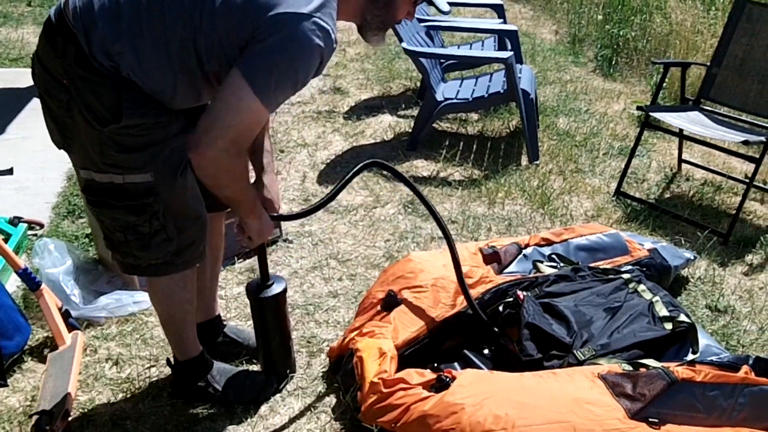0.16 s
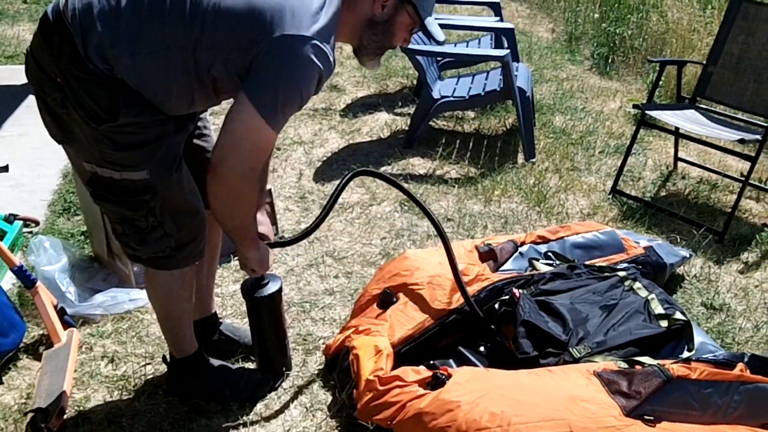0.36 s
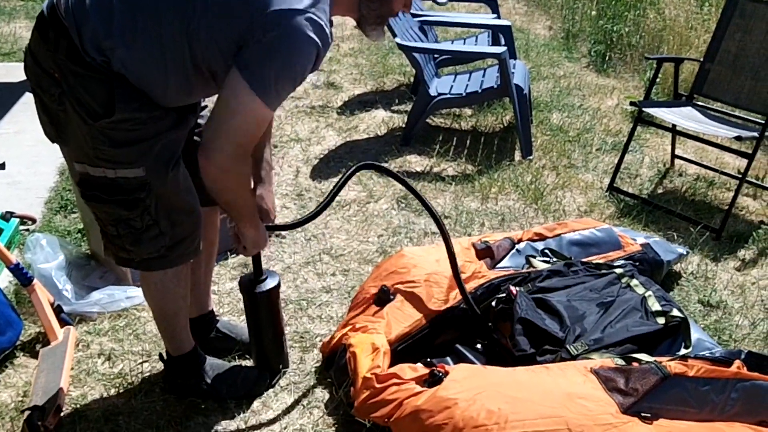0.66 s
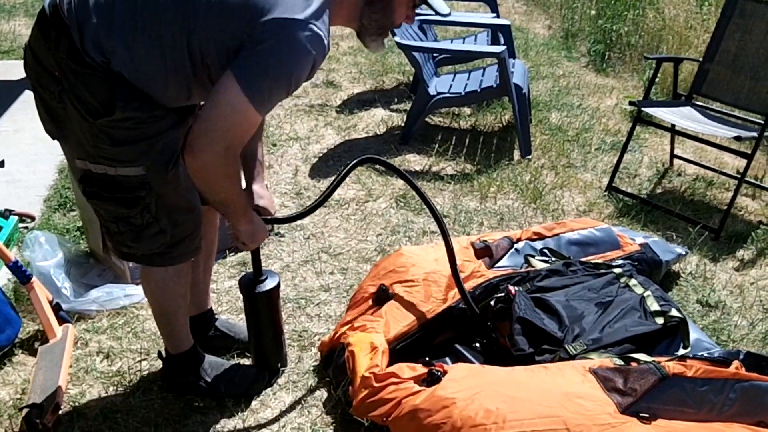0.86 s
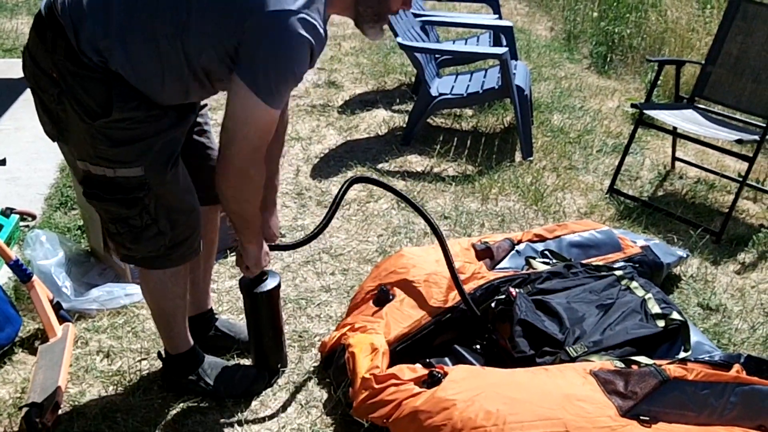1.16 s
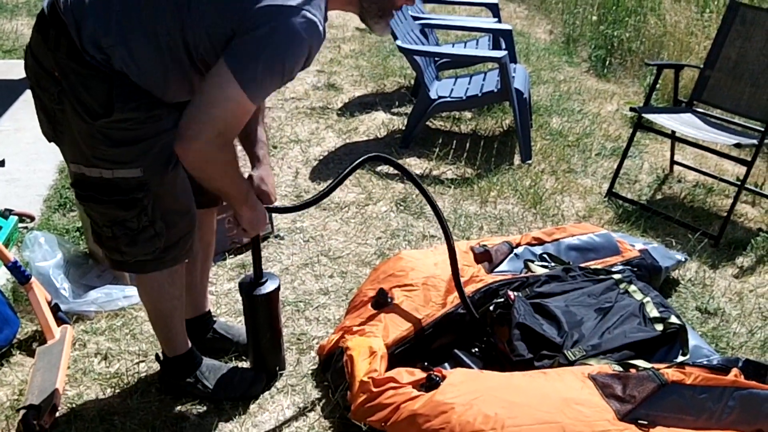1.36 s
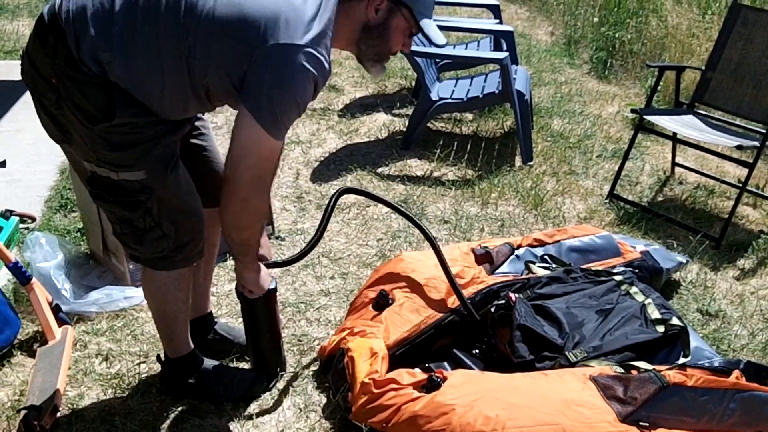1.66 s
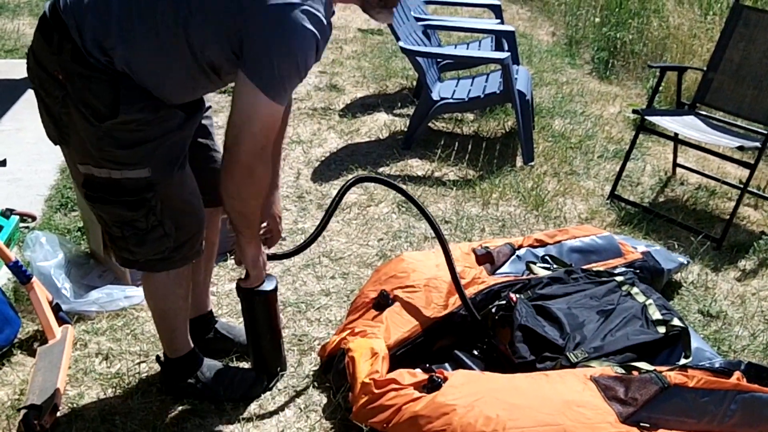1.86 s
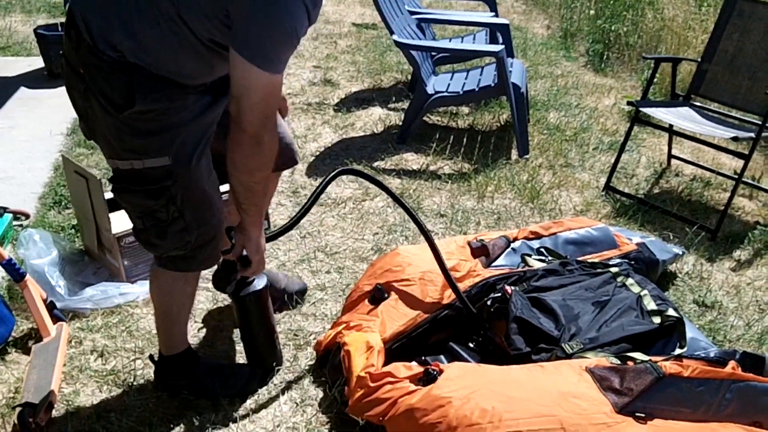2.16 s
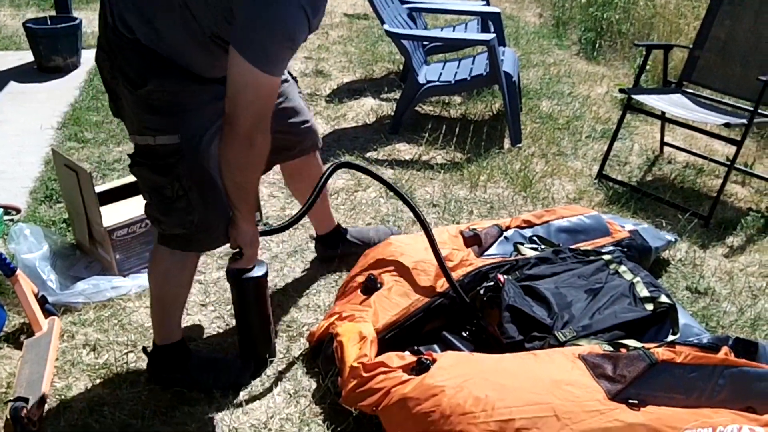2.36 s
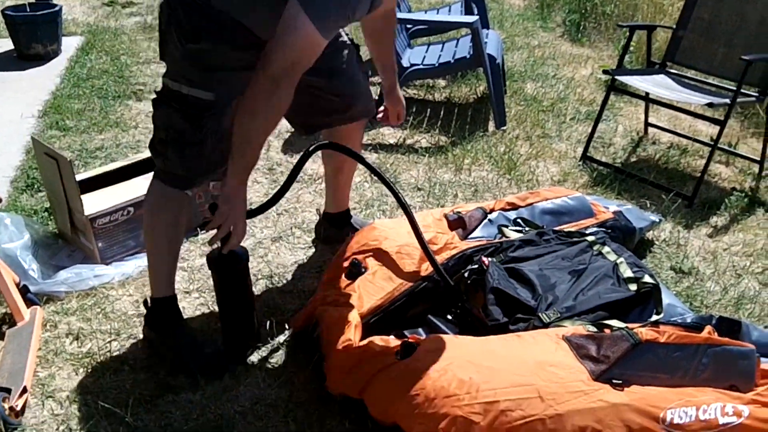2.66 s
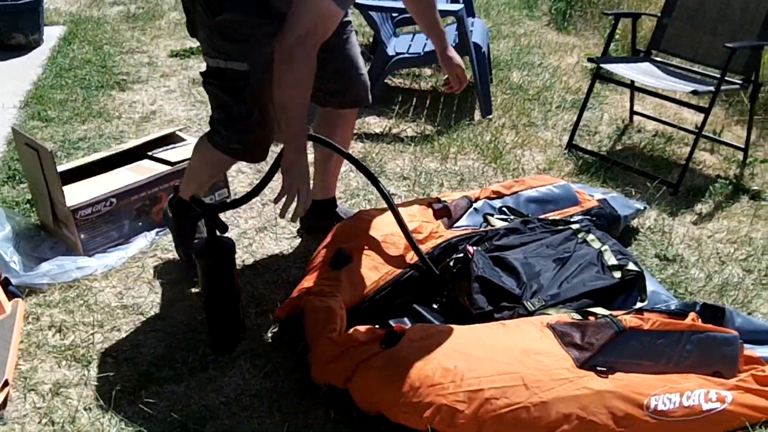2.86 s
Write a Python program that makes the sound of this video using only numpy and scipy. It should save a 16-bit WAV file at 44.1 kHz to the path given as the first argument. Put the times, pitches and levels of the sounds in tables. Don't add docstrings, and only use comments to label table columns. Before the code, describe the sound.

A plastic hand air pump, close and dry outdoors, roars on down strokes from about 0.1, 0.6 and 1.2 seconds, each ending in a hard hollow knock near 0.3, 0.9 and 1.5. Hissing up strokes between carry brief high valve whistles. From 1.8, handle and hose clatter, with another sharp tap near 2.3, then light clicks and rustling cloth and dry grass over faint wind and distant hum.

```python
import sys
import numpy as np
from scipy import signal
from scipy.fft import rfft, irfft
from scipy.io import wavfile
from scipy.ndimage import uniform_filter1d

SR = 44100
rng = np.random.default_rng(int(sys.argv[2]) if len(sys.argv) > 2 else 0)


def gain_from_db(level_db):
    decades = np.asarray(level_db, float) / 20
    return 10 ** decades


def transcribe(signal):
    frames = np.atleast_2d(signal).T
    limited = np.clip(frames, -1, 1)
    pcm = np.round(limited * 32767).astype(np.int16)
    wavfile.write(sys.argv[1], SR, pcm)


N = 132300
T = np.arange(N) / SR

# pitch_hz, density_db (per Hz)
YARD_TONE = [(25, 9), (100, -20), (300, -1.5), (800, 4), (1500, -3), (3500, -9.5), (7000, -19),
             (15000, -7.5)]
# pitch_hz, width_hz, level_db
MACHINE_HUM = [(119, 10, -58), (157, 13, -56.5), (239.3, 4.6, -49)]
# time_s, level_db
WIND_GUSTS = [
    (0, -51),
    (.25, -41),
    (.5, -54.5),
    (.9, -78),
    (1.3, -56),
    (1.9, -50.5),
    (2.5, -49),
    (3, -60),
]
# start_s, length_s, peak (share of length), level_db, air_column_pitch (ratio)
UP_STROKES = [
    (-.2, 0.28, 0.35, -23.5, 0.97),
    (.34, 0.28, 0.44, -24, 1.04),
    (.915, 0.29, 0.43, -24.5, 1.02),
    (1.505, 0.3, 0.51, -23.5, 1.01),
    (1.995, 0.2, 0.25, -40, 1.16),
]
# start_s, length_s, peak (share of length), level_db, air_column_pitch (ratio)
DOWN_STROKES = [
    (.07, 0.3, 0.45, -21, 0.97),
    (.635, 0.32, 0.45, -22, 0.97),
    (1.19, 0.36, 0.5, -20.5, 1.035),
]
# pitch_hz, density_db (per Hz)
UP_JET = [(150, -38.5), (600, 2), (1200, 1.5), (2100, 5), (3200, 1.5), (4300, 5), (6500, -21.5),
          (15000, -5.5)]
DOWN_JET = [(150, -45), (600, -4.5), (1200, -2.5), (2100, 8.5), (3200, 4.5), (4300, 0.5), (6500, -2.5),
            (15000, -2.5)]
# pitch_hz, width_hz, level_db (over the jet), gain_db (along the stroke)
UP_PIPE = [(1520, 43, -11, -3), (1995, 46, -7, -6.5), (2516, 99, -10.5, 8), (2932, 19, -11, 5),
           (3880, 100, -8.5, -6.5), (4290, 110, -7, 7), (4840, 140, -18, 16), (5010, 170, -18, 21)]
DOWN_PIPE = [(1320, 23, -17.5, -23), (2057, 210, -8.5, -13), (2460, 84, -17.5, 9), (4030, 160, -6, 0.5),
             (4396, 250, -7, 0), (5300, 340, -12, 12), (5960, 130, -18, 21), (12800, 830, -17.5, .3)]
# start_s, thud_db, jolt_db
HEAD_STOPS = [(.0575, -23.5, -31.5), (0.0626, -32, -37), (0.07, -29, -36), (.078, -26, -32),
              (0.627, -25.5, -30), (.633, -23.5, -52), (.641, -29, -38), (0.669, -26, -36.5),
              (1.193, -27, -34), (1.2, -21, -33), (1.208, -33, -31.5), (1.842, -34, -27)]
# start_s, thud_db, thud_tilt_db (per octave), clack_db, clack_tilt_db (per octave)
FOOT_KNOCKS = [(.3198, -15.5, -1, -38, 0), (.3298, -8.5, 2, -22, -2), (.3325, -12, -7.5, -40, 0),
               (.3365, -8, 4, -12, 6), (.341, -20, -9, -34, 0), (.352, -19, 0.5, -50, 0),
               (.9072, -15, 3, -26, 2), (.9097, -10.5, -3.5, -6, 5), (.9125, -16.5, -2, -11, -7),
               (.917, -17, 5, -30, -3), (.928, -16.5, 1.5, -31, -3), (.939, -21, -3.5, -52, 0),
               (1.4815, -19, 3, -45, 0), (1.486, -18.5, -5, -45, 0), (1.4918, -10.5, -1, -40, 0),
               (1.4965, -15, -2.5, -32, 6), (1.5, -9.5, 0.5, -37, 0), (1.5058, -14, 2, -8, -4),
               (1.5072, -26, -2, -8.5, -16), (1.511, -17, -2, -28, -2), (1.520, -19, -4.5, -26, -8)]
# pitch_hz, level_db, t60_s
BARREL_MODES = [(136, -9.5, 0.034), (164, -15, 0.068), (313, -4, 0.018), (443, -11.5, 0.037),
                (546, 0.5, 0.041), (625, 1, 0.043), (743, -6, 0.04), (1046, -3.5, 0.03),
                (1195, -1.5, 0.036), (1606, -3.5, 0.041), (2010, 4, 0.0072)]
CLACK_MODES = [(1640, -12, 0.0082), (2310, -35, 0.012), (2720, 3, 0.013), (3450, -22, 0.0091),
               (3670, 11, 0.0058), (4280, 4.5, 0.0062), (5200, -9.5, 0.016), (5600, -19, 0.0066),
               (5960, -7.5, 0.0056)]
JOLT_MODES = [(72.5, 2, 0.13), (120, -4.5, 0.057), (194.6, 3.5, 0.13), (268, 2, 0.11)]
# start_s, length_s, from_hz, to_hz, level_db
VALVE_WHISTLES = [
    (0.455, .075, 15500, 12000, -33),
    (0.51, .045, 10500, 5000, -39),
    (1.065, 0.045, 15500, 13000, -32),
    (1.105, .048, 9200, 4600, -45),
    (1.70, 0.035, 14400, 12600, -32.5),
    (1.832, 0.03, 9200, 11300, -45),
    (1.835, .045, 5800, 6100, -49),
]
# start_s, level_db, rattle_s, tilt_db (per octave)
HOSE_TAPS = [(1.803, -23, .003, 1), (1.8052, -13, 0.0036, -1.5), (1.8107, -15.5, 0.0048, -6.5),
             (1.8132, -18.5, 0.0085, -4.5), (1.819, -20, 0.0062, -2), (1.8225, -18.5, 0.0068, -4),
             (1.8295, -17, 0.0091, -7.5), (1.836, -25, 0.0091, -8), (1.843, -32, 0.019, -6),
             (1.85, -31, 0.0067, -13), (2.01, -32, 0.007, 7), (2.022, -26, 0.0031, 9),
             (2.2675, -15.5, 0.0055, -1.5), (2.271, -13, .004, 3), (2.276, -23, 0.0059, 9),
             (2.2793, -21.5, 0.007, -6), (2.284, -31, 0.0092, -13), (2.292, -29.5, 0.0091, -6),
             (2.379, -33, 0.0039, 3), (2.385, -32, 0.0095, -6), (2.406, -32, 0.0024, 6),
             (2.48, -25, 0.006, -1.5), (2.482, -27, 0.0065, 2), (2.498, -43, 0.005, 11),
             (2.541, -26, 0.0029, 9), (2.551, -28, 0.002, 1.5), (2.622, -31.5, 0.0061, -5),
             (2.629, -24, 0.0043, -4), (2.634, -34, 0.0043, 3), (2.747, -30, 0.0027, -5),
             (2.77, -42, .003, 0), (2.832, -32.5, 0.0067, 5), (2.937, -31, 0.0038, 8)]
# pitch_hz, level_db, t60_s
HANDLE_MODES = [(266, -13.5, 0.031), (564, -5, 0.044), (709, -6, 0.067), (850, 6, 0.015),
                (1005, 4.5, 0.038), (1200, 2, 0.018), (1550, 3, 0.054), (2030, 7.5, 0.02),
                (2600, 4.5, 0.012), (2970, -5, 0.027), (3780, 0, 0.017), (4080, -1, 0.015),
                (4820, -7.5, 0.015), (6250, -28, 0.0063)]
# time_s, level_db
RUSTLE_LEVEL = [(1.86, -40), (1.969, -91), (2.021, -37), (2.05, -38.5), (2.15, -42.5), (2.2, -52),
                (2.32, -49), (2.44, -53), (2.5, -41.5), (2.58, -61), (2.66, -63), (2.72, -43), (2.78, -42),
                (2.86, -45), (2.91, -57), (3.0, -49)]
# pitch_hz, density_db (per Hz)
RUSTLE_COLOUR = [(150, -17), (500, -11), (1000, -1.5), (2500, -4.5), (4500, -12.5), (7000, -21),
                 (15000, -9.5)]


def evened(x):
    return x / np.sqrt(np.mean(x ** 2) + 1e-20)


def read(points, hz):
    f, value = np.transpose(points)
    return np.interp(np.log(hz + 1), np.log(f + 1), value)


def wander(rate):
    slowed = rfft(rng.standard_normal(N)) / (1 + (np.fft.rfftfreq(N, 1 / SR) / rate) ** 4)
    return evened(irfft(slowed, N))


def noise(tone, patch_db, tilt_db=np.zeros(N)):
    tilt_above_hz = 1650
    frames, hz = N // 64 + 5, np.fft.rfftfreq(512, 1 / SR)
    a, b, patches = rng.standard_normal((frames, len(hz), 3)).T
    patches = uniform_filter1d(patches, size=4, axis=0)
    patches = evened(uniform_filter1d(patches, size=20, axis=1))
    octaves = np.log2(np.maximum(hz, tilt_above_hz) / tilt_above_hz)[:, None]
    tilt = np.interp(np.arange(frames) * 64, np.arange(N), tilt_db) * octaves
    z = (a + 1j * b) * gain_from_db(read(tone, hz)[:, None] + patch_db * patches + tilt)
    return evened(signal.istft(z, nperseg=512, noverlap=448)[1][:N])


def resonate(x, hz, width):
    turn = np.exp(2j * np.pi * np.cumsum(hz * np.ones(len(x))) / SR)
    r = np.exp(-np.pi * width / SR)
    return 2 * (turn * signal.lfilter([1 - r], [1, -r], x / turn)).real


def add(mix, s, sound):
    part = mix[round(s * SR):][:len(sound)]
    part += sound[:len(part)]


def ring(modes, tilt_db=0., free=1.):
    detune, chance_db = 0.031, 0.5
    puff_db, puff_s = -22, 0.0043
    rise_s = .0005
    t, out = T[:4000], np.zeros(4000)
    for (hz, db, t60), (u, v, w) in zip(modes, rng.random((len(modes), 3))):
        level_db = db + tilt_db * np.log2(hz / 1000) + chance_db * (v - .5)
        decay_db = -60 * t / (t60 * free)
        tone = np.sin(2 * np.pi * hz * (1 + detune * (u - .5)) * t)
        out += gain_from_db(level_db + decay_db) * tone * np.sign(w - .5)
    contact = gain_from_db(puff_db) * rng.standard_normal(800) * np.exp(-T[:800] / (puff_s * free))
    contact[0] = 1
    out = signal.fftconvolve(out * (1 - np.exp(-t / (rise_s * free))), contact)
    return out / abs(out).max()


def steady(hz, width):
    tone = resonate(rng.standard_normal(N), hz, width)
    return evened(tone / np.sqrt(uniform_filter1d(tone ** 2, size=3000) + 0.22 * np.mean(tone ** 2)))


def yard():
    floor_db, wind_hz, gust_db = -40.5, 50, 5
    fade_db = -2 * T
    hum = sum(gain_from_db(db + fade_db + 2.0 * wander(7.9)) * steady(hz, w) for hz, w, db in MACHINE_HUM)
    wind = signal.sosfilt(signal.butter(2, wind_hz, fs=SR, output="sos"), rng.standard_normal(N))
    wind_db = np.interp(T, *np.transpose(WIND_GUSTS)) + gust_db * wander(2.0)
    return gain_from_db(floor_db) * noise(YARD_TONE, 0.63) + hum + gain_from_db(wind_db) * evened(wind)


def hiss(strokes, power, jet, pipe, bend, late_db):
    flat_top = 0.41
    slow_dull_db = -5
    patch_db, flutter_db = 1, -0.5
    pipe_wobble, pipe_flicker_db = .008, 3
    speed, level, travel, pitch = np.zeros(N), np.zeros(N), np.zeros(N), np.ones(N)
    for start, length, peak, db, share in strokes:
        pitch[T >= start] = share
        u = np.clip((T - start) / length, 0, 1)
        skew = np.log(.5) / np.log(peak)
        arch = np.sin(np.pi * u ** skew) * (u < 1)
        speed += arch
        level += gain_from_db(db) * np.tanh(flat_top * arch ** power) / np.tanh(flat_top)
        travel += (u - .5) * (arch > 0)
    air = noise(jet, patch_db, slow_dull_db * (1 - np.clip(speed, 0, 1)) + late_db * travel)
    white = rng.standard_normal(N)
    for hz, width, db, gain_db in pipe:
        sing_db = db + gain_db * travel + pipe_flicker_db * wander(10.4)
        column_hz = hz * (pitch + bend * travel + pipe_wobble * wander(37))
        air = air + gain_from_db(sing_db) * evened(resonate(white, column_hz, width))
    return level * evened(air * gain_from_db(flutter_db * wander(420)))


def pump_air():
    up = hiss(UP_STROKES, 1.37, UP_JET, UP_PIPE, bend=0.13, late_db=13)
    down = hiss(DOWN_STROKES, 1.64, DOWN_JET, DOWN_PIPE, bend=0.062, late_db=1.5)
    return down + signal.sosfilt(signal.butter(8, 14000, fs=SR, output="sos"), up)


def knocks():
    out = np.zeros(N)
    for s, thud_db, jolt_db in HEAD_STOPS:
        add(out, s, gain_from_db(thud_db) * ring(BARREL_MODES, 1.5) + gain_from_db(jolt_db) * ring(JOLT_MODES))
    for s, thud_db, thud_tilt_db, clack_db, clack_tilt_db in FOOT_KNOCKS:
        thud = gain_from_db(thud_db) * ring(BARREL_MODES, thud_tilt_db, 0.72)
        clack = gain_from_db(clack_db) * ring(CLACK_MODES, clack_tilt_db, 0.81)
        add(out, s, thud + clack)
    return signal.sosfilt(signal.butter(2, 80, "highpass", fs=SR, output="sos"), out)


def whistles():
    width_hz = 320
    out = np.zeros(N)
    for start, length, from_hz, to_hz, db in VALVE_WHISTLES:
        u = np.linspace(0, 1, round(length * SR))
        hz = from_hz * (to_hz / from_hz) ** u
        tone = resonate(rng.standard_normal(len(u)), hz, width_hz)
        tone = resonate(tone, hz, width_hz)
        add(out, start, gain_from_db(db) * evened(tone) * np.sin(np.pi * u))
    return out


def taps():
    rattle_per_s, scrape_db, scrape_hz = 450, -20, (450, 4500)
    free_ring_s = 0.0096
    out = np.zeros(N)
    for s, db, length, tilt_db in HOSE_TAPS:
        dying = np.exp(-T[:3000] / length)
        bounce = rng.standard_normal(3000) * (rng.random(3000) < rattle_per_s / SR) * dying * 0.53
        bounce[0] = 1
        scrape = signal.lfilter(*signal.butter(2, scrape_hz, "bandpass", fs=SR), rng.standard_normal(3000))
        add(out, s, gain_from_db(db + scrape_db) * dying * evened(scrape))
        body = ring(HANDLE_MODES, tilt_db, min(length / free_ring_s, 1))
        add(out, s, gain_from_db(db) * signal.fftconvolve(bounce, body))
    return out


def rustle():
    crinkle_db, crinkles_per_s = -5.5, 1300
    size_db = 4.8 * np.minimum(rng.exponential(1, N), 3.5)
    crinkle = (rng.random(N) < crinkles_per_s / SR) * gain_from_db(size_db) * rng.choice([-1, 1], N)
    grains = sum(evened(resonate(crinkle * (rng.random(N) < .4), hz, 500)) for hz in (920, 1720, 2500, 4300))
    body = noise(RUSTLE_COLOUR, 3.3) * gain_from_db(1.2 * wander(43)) + gain_from_db(crinkle_db) * evened(grains)
    level_db = np.interp(T, *np.transpose(RUSTLE_LEVEL))
    return body * gain_from_db(level_db) * np.clip((T - 1.84) / 0.016, 0, 1)


def scene():
    return (yard() + pump_air() + knocks() + whistles() + taps() + rustle())[None]


def band_limit(x):
    return signal.sosfilt(signal.butter(12, 15220, fs=SR, output="sos"), x)


def record(dry):
    notch_hz, notch_width_hz, notch_db = 7930, 300, -50
    shelf_hz, shelf_db = 7220, -8
    top_hz, top_db = 14200, -7
    holes_from_hz, hole_db = 7200, -35
    quiet_hole_share, loud_hole_share = .2, .36
    hz, _, z = signal.stft(dry, SR, nperseg=1024)
    notch = notch_db * np.exp(-((hz - notch_hz) / notch_width_hz) ** 2)
    shelf = shelf_db * (1 + np.tanh((hz - shelf_hz) / 400)) / 2
    top = top_db * np.clip(hz - top_hz, 0, 1500) / 1500
    z = z * gain_from_db(notch + shelf + top)[:, None]
    power = abs(z[0]) ** 2
    loud = np.clip((10 * np.log10(power.sum(0) + 1e-12) + 45) / 12, 0, 1)
    chance = rng.random((z.shape[2] // 5 + 1, len(hz) // 3 + 1))
    chance = chance.repeat(5, axis=0).repeat(3, axis=1)[:z.shape[2], :len(hz)].T
    weak = uniform_filter1d(power, size=7, axis=0) < 2 * uniform_filter1d(power, size=81, axis=0)
    share = quiet_hole_share + (loud_hole_share - quiet_hole_share) * loud
    share = share * (1 + 1.5 * (hz > top_hz))[:, None]
    holes = (chance < share) * weak * (hz > holes_from_hz)[:, None]
    mix = signal.istft(z * gain_from_db(hole_db * holes), SR, nperseg=1024)[1][:, :N]
    return band_limit(mix)


dry = scene()
out = record(dry)
transcribe(out)
```